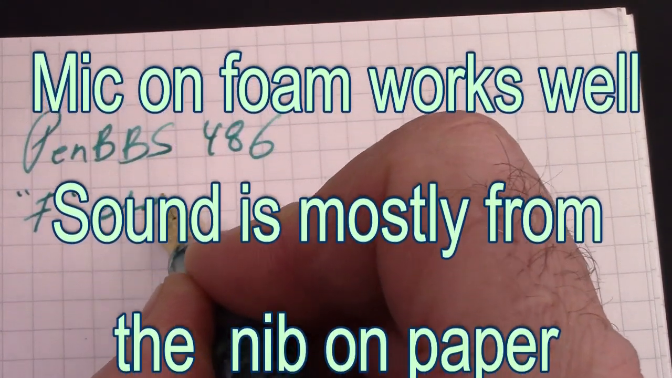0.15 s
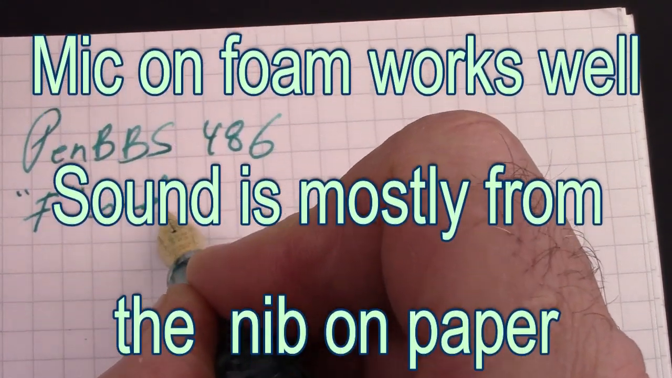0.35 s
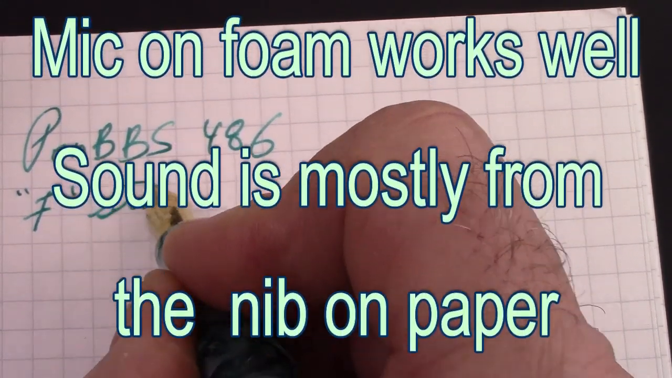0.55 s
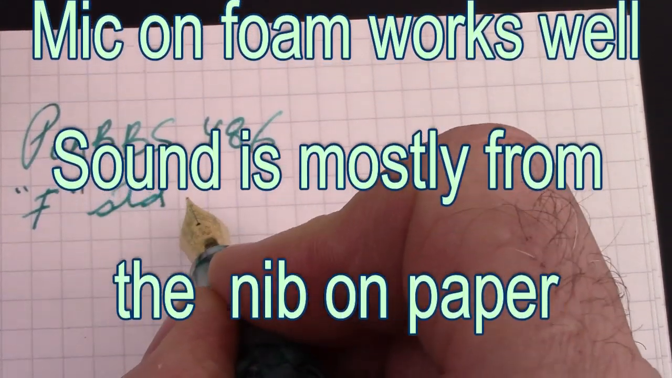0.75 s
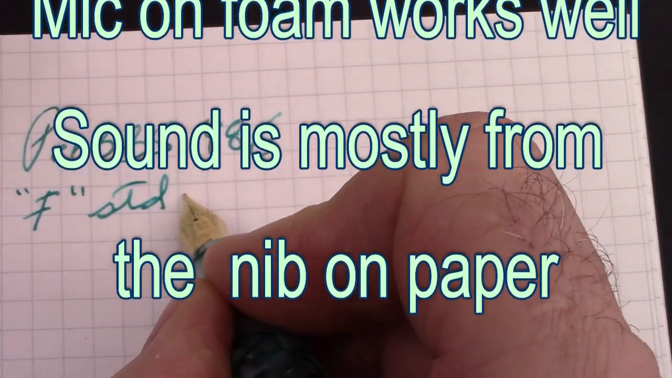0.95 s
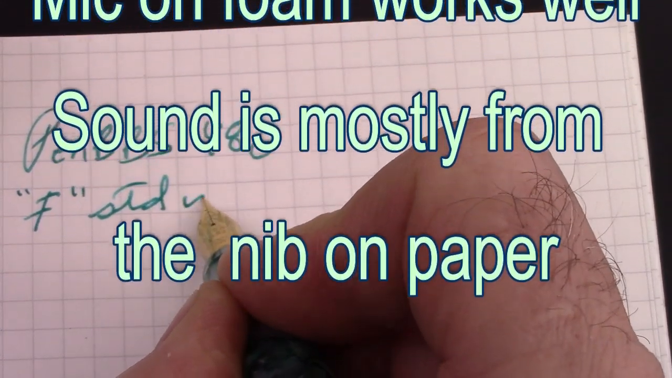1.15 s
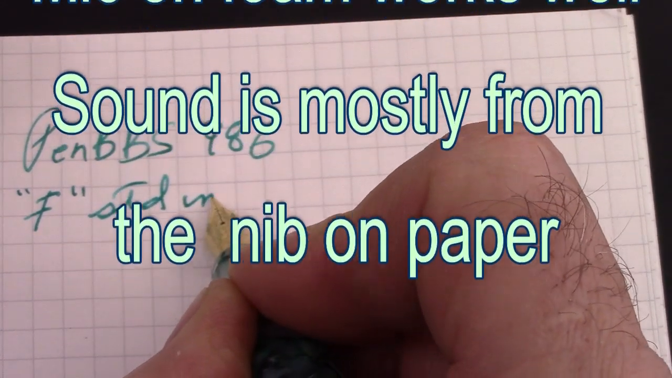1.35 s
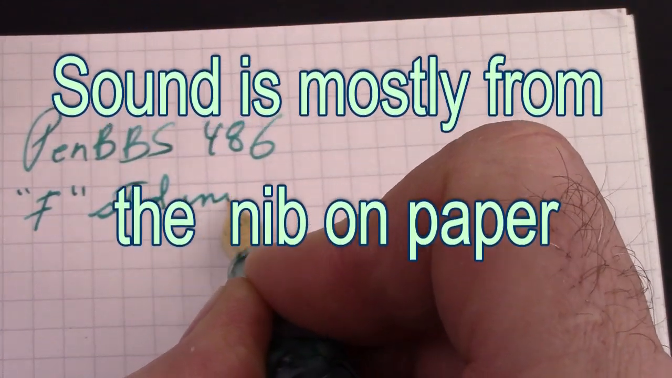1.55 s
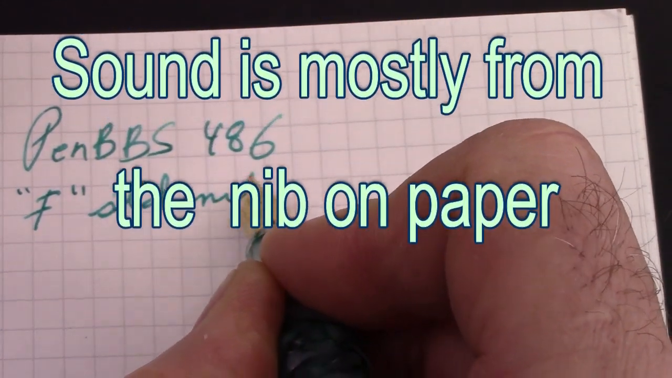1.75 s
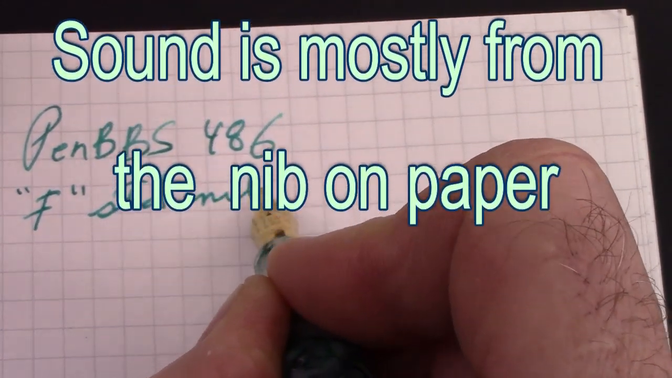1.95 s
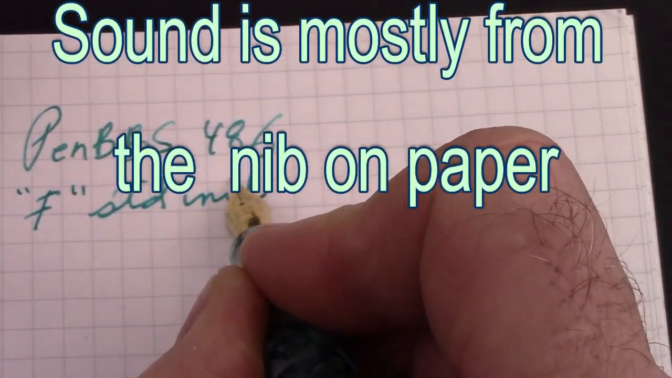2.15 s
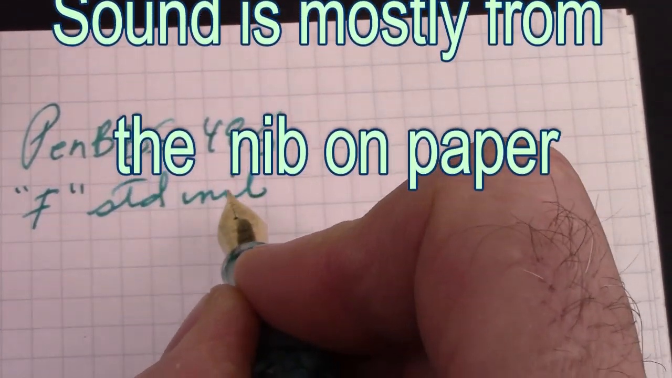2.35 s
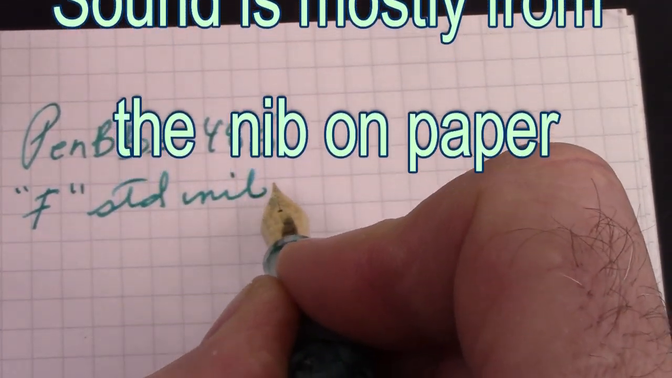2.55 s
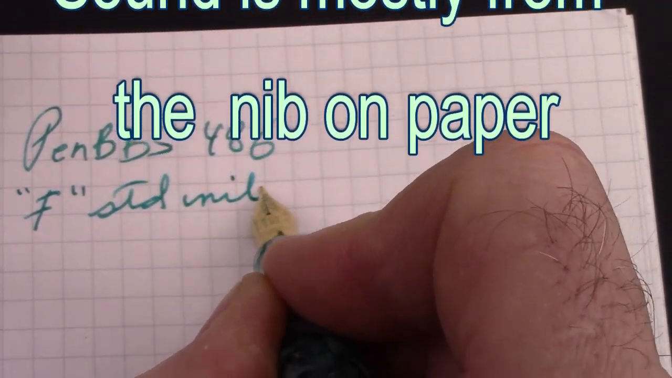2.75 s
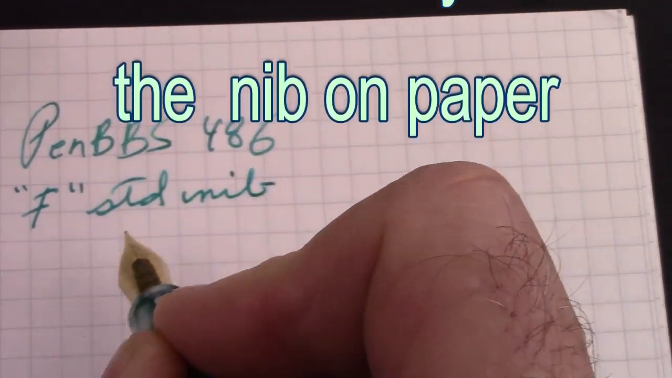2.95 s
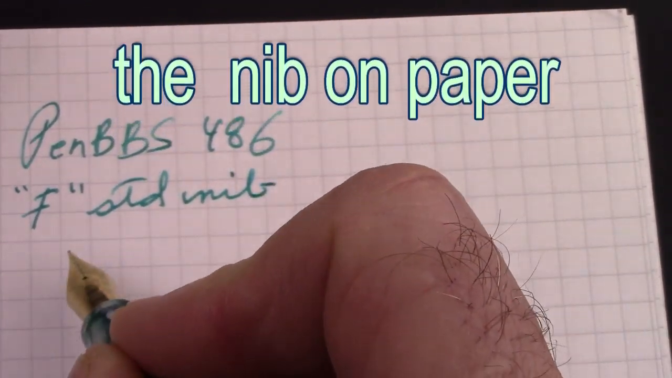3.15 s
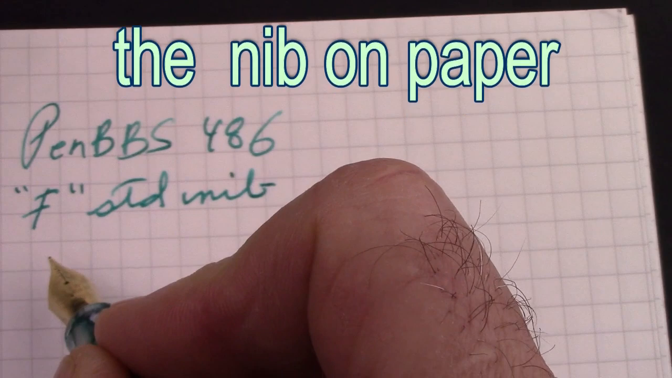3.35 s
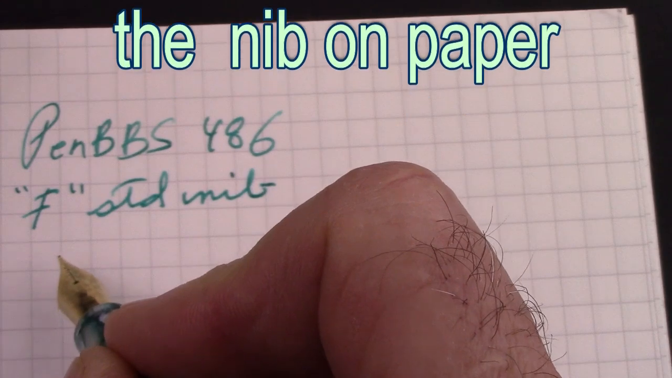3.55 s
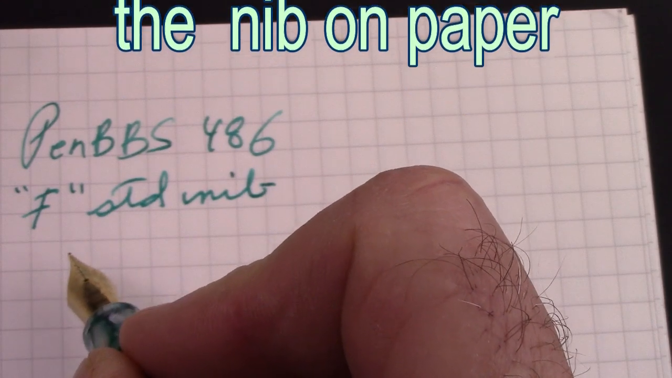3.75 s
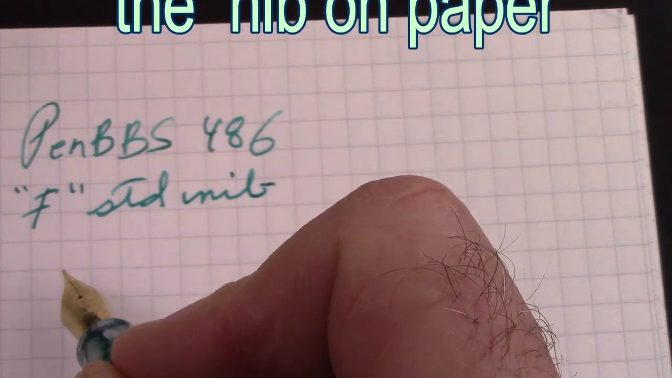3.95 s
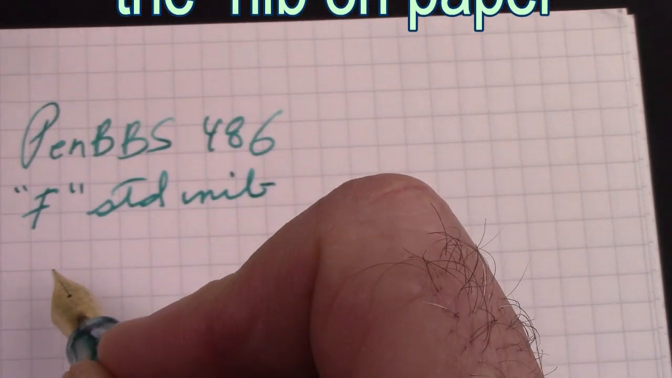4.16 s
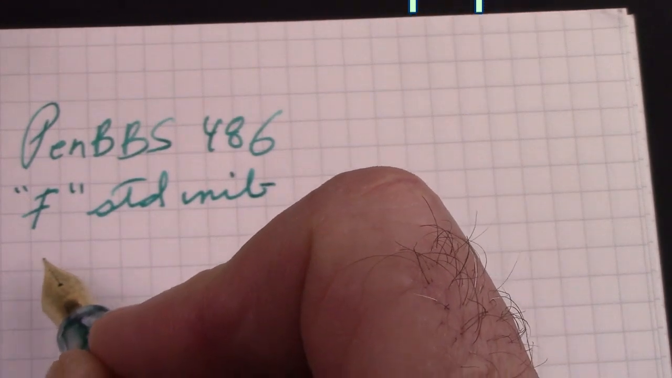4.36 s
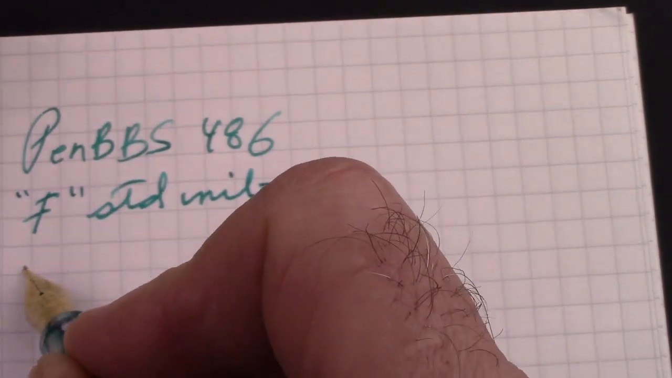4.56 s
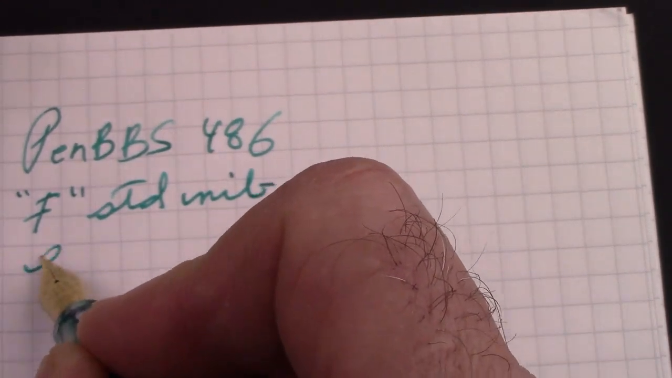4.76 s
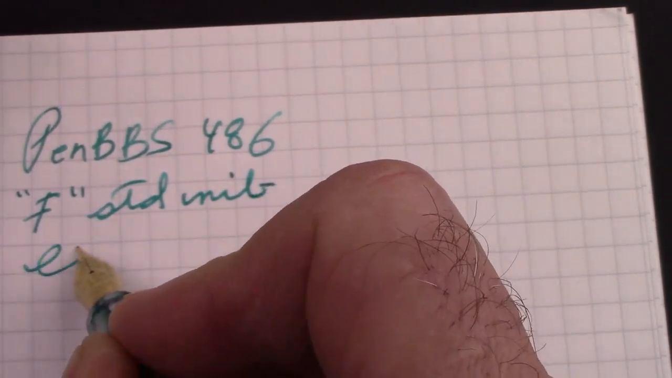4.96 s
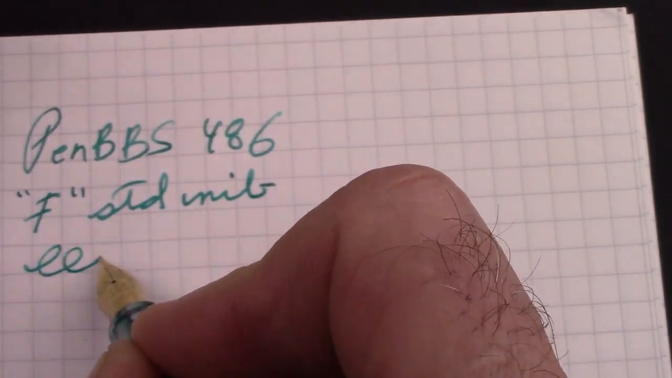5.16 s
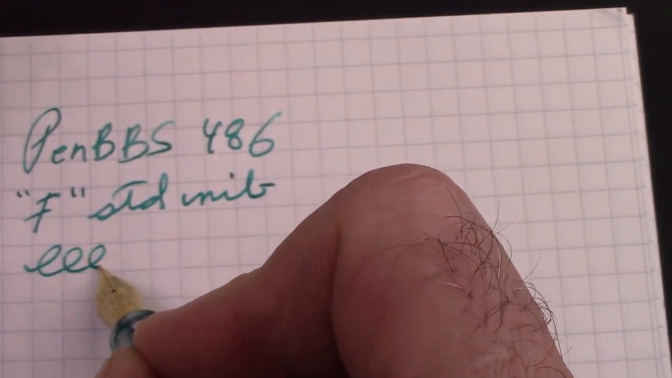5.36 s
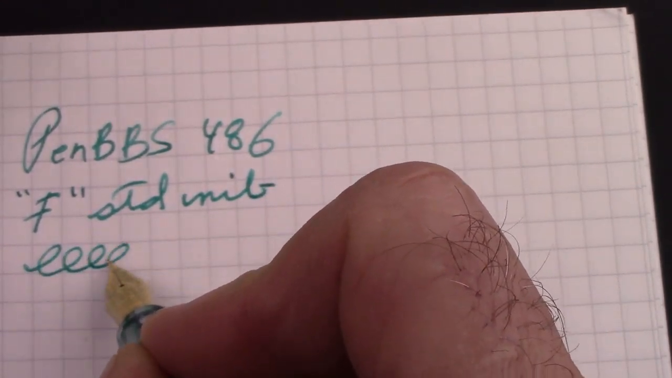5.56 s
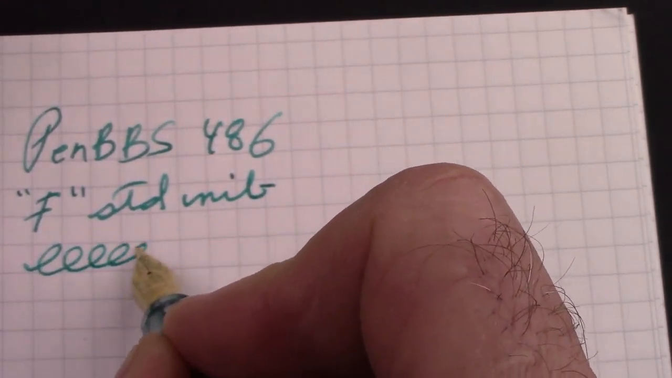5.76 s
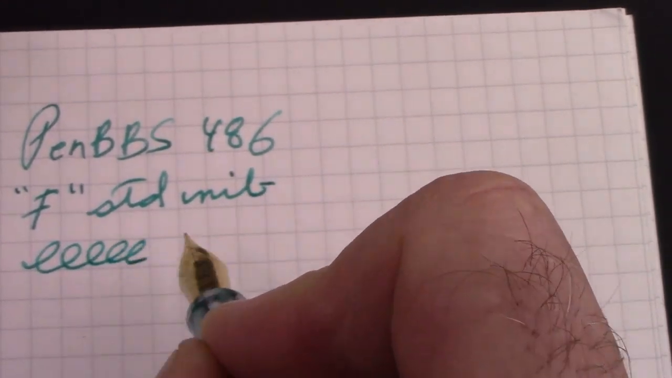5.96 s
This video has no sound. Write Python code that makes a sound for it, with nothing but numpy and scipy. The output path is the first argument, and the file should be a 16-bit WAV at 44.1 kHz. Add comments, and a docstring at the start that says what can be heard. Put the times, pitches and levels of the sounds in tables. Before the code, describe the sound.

In a quiet room, close and dry, a nib makes short papery scratches for about two seconds, mixed with crisp ticks and soft low thumps as the hand lifts and lands. A few light touches follow, then near quiet with hum and hiss and a barely audible cricket-like pulse. Finally the scratching returns louder, in steady quick back-and-forth strokes, about four a second, until the end.

```python
"""Nib writing on a paper pad

A metal nib writes on a pad in a quiet room, a microphone lying close on foam on the same desk.
Paper fibres pluck the nib: random plucks ring sheet, pad and tines. The hand slides with a brighter
hiss; taps tick (short crackle) and thump (smooth pushes ringing the desk). Behind: a wavering low hum
of drifting sines and rumble, a faint pulsing high tone, and coloured room and microphone hiss."""
import sys
import numpy as np
from scipy import signal
from scipy.fft import rfft, irfft
from scipy.io import wavfile
from scipy.ndimage import uniform_filter1d

SR = 44100
rng = np.random.default_rng(int(sys.argv[2]) if len(sys.argv) > 2 else 0)


def transcribe(u):
    """Save the signal u as a 16-bit wav file named by the first command-line argument.

    u: samples, shape (n,) or (channels, n), limited to [-1, 1]; the rate is SR.
    q: integer samples, one column per channel.
    """
    v = np.clip(np.atleast_2d(u).T, -1, 1)
    q = np.round(v * 32767).astype(np.int16)
    wavfile.write(sys.argv[1], SR, q)


def undo_db(level):
    """Turn decibels back into plain size, where 20 dB means ten times bigger."""
    steps = np.asarray(level, float) / 20
    return 10 ** steps


N = 264600
T = np.arange(N) / SR

# Strokes of the nib. Each row: time of peak in seconds, length in seconds, sheet scratch in dB rms,
# gain of the pad drag relative to the sheet in dB, gain of the airy top relative to the sheet in dB.
STROKES = [(0.023, 0.065, -48.5, 5.5, -13), (0.141, 0.11, -42, -1.5, -8.5), (0.261, 0.083, -40, 0.5, -15),
           (0.408, 0.047, -59.5, -3, 10), (0.506, 0.12, -41.5, 1, -7.5), (0.594, 0.074, -57.5, 2, 10.5),
           (.716, 0.15, -56.5, 8.5, -13), (0.914, 0.046, -47, 1, -7), (0.97, 0.078, -48, 3, -10),
           (1.064, 0.051, -42, 2, -12.5), (1.15, .05, -45.5, 5, -21), (1.258, 0.075, -52, 3, -7),
           (1.403, .14, -55, 6, -9), (1.526, 0.1, -47, 4.5, -18), (1.6, 0.11, -44.5, 3, -7.5),
           (1.779, 0.096, -43, 4, -13), (1.855, 0.12, -45, 5.5, -13.5), (1.985, 0.065, -58, 5, -1),
           (2.07, .1, -52, 4, -5), (2.203, 0.17, -54, -1.5, -3.5), (2.778, 0.091, -50.5, 5, -8),
           (2.878, 0.048, -48, 1, 3.5), (2.92, 0.068, -52.5, 3, 11.5), (3.06, 0.37, -60.5, -1, -1.5),
           (3.3, 0.28, -56.5, 1, -12), (3.91, 0.15, -57.5, 2, -2.5), (4.35, 0.52, -63, 3.5, -3),
           (4.545, 0.051, -52, 3, -8), (4.599, 0.076, -36.5, 5, -9.5), (4.655, 0.051, -41, -4, -10),
           (4.758, 0.13, -43.5, 2, -9), (4.844, 0.078, -35.5, 2, -11), (4.902, 0.069, -44.5, -9, -6),
           (5.017, 0.15, -45.5, -1, -11.5), (5.105, 0.079, -35.5, 0.5, -11.5),
           (5.164, 0.049, -43.5, 5, -11), (5.276, 0.094, -42.5, 1.5, -13), (5.356, 0.073, -37.5, .6, -12),
           (5.404, 0.064, -45.5, 1, -7.5), (5.519, .09, -43.5, 2.2, -11.5),
           (5.609, 0.094, -37.5, 2.5, -12.5), (5.657, 0.059, -43, -6, -14), (5.765, 0.054, -37.5, 1, -14.5),
           (5.841, 0.071, -43, 2.5, -10), (5.891, 0.073, -51.5, 8, -4), (5.936, 0.079, -55.5, 5, 12)]
NIB_REST_DB = -67.5  # gain between strokes


def level(x, db):
    """Scale to an rms level."""
    return x * undo_db(db) / np.sqrt(np.mean(x ** 2))


def peak(x, db):
    """Scale to a peak level."""
    return x * undo_db(db) / abs(x).max()


def resonance(x, hz, width_hz):
    """Two-pole band-pass, gain 1 at the centre."""
    return signal.lfilter(*signal.iirpeak(hz, hz / width_hz, fs=SR), x)


def body(x, modes, ratio=-1):
    """Sum of resonances, mode k weighted by ratio ** k; by default neighbours have opposite sign."""
    out = np.zeros(len(x))
    for k, (hz, width_hz, db) in enumerate(modes):
        out += ratio ** k * undo_db(db) * resonance(x, hz, width_hz)
    return out


def band(x, lo_hz, hi_hz):
    """Butterworth band-pass."""
    return signal.sosfilt(signal.butter(2, [lo_hz, hi_hz], "band", fs=SR, output="sos"), x)


def walk(rate_hz):
    """Random levels held 1 / rate_hz seconds and smoothed twice; spread near 1."""
    hold = int(SR / rate_hz)
    steps = np.repeat(rng.standard_normal(N // hold + 1), hold)
    return 1.338 * uniform_filter1d(uniform_filter1d(steps, hold), hold)[:N]


def fibres(spread_db, patchy_db, patch_rate_hz):
    """Dense tiny plucks, some stronger up to a limit, in patches of rougher and smoother paper."""
    tall = np.minimum(rng.exponential(size=N), 5)
    return rng.standard_normal(N) * undo_db(spread_db * tall + patchy_db * walk(patch_rate_hz))


def hiss(spectrum, db):
    """Steady noise of a given colour; its rms level is set in the band 266-13000 Hz."""
    hz, colour_db = np.transpose(spectrum)
    f = np.fft.rfftfreq(N, 1 / SR) + 1  # +1 avoids log(0)
    colour = undo_db(np.interp(np.log(f), np.log(hz), colour_db))
    x = irfft(rfft(rng.standard_normal(N)) * colour, N)
    return x * undo_db(db) / np.std(band(x, 266, 13000))


def gestures(rows, peak_dbs, rest_db, roundness=1.69):
    """Gain of gestures that swell and fade by one rule, summed in power over a resting level."""
    edge_db = 12  # drop from peak to either end of the length
    rise_share = 0.49  # part of the length spent rising
    power = np.full(N, undo_db(rest_db) ** 2)
    for (s, length_s), peak_db in zip(np.array(rows)[:, :2], peak_dbs):
        away = np.where(T < s, (s - T) / rise_share, (T - s) / (1 - rise_share)) / length_s
        near = away < 4
        power[near] += undo_db(peak_db - edge_db * away[near] ** roundness) ** 2  # roundness 1 = pointed
    return np.sqrt(power)


def room():
    """Hiss of room and microphone, wavering a little."""
    # Each row: frequency in Hz, relative density in dB per Hz.
    spectrum = [(53, -51), (90, -28), (125, 0.5), (148, -16), (188, -14.5), (290, -39), (345, -16),
                (410, -24.5), (532, -22.5), (1680, -31), (2130, -31.5), (5780, -34), (16000, -41.5)]
    return hiss(spectrum, -54.5) * undo_db(0.95 * walk(5.1))


def channel_hiss():
    """Faint coloured noise for the difference between the channels."""
    # Each row: frequency in Hz, relative density in dB per Hz.
    spectrum = [(59, -77), (100, -47), (174, -9), (398, -5), (2370, -7.5), (8640, -10), (14400, -14),
                (16000, -20)]
    return hiss(spectrum, -67.5)


def hum():
    """A low hum that wavers in level and pitch, blurred by rumble, with thinner tones above it."""
    # Each row: frequency in Hz, wander in Hz, relative level in dB.
    hum_modes = [(62, 2.5, 0), (74, 3, -7)]
    # Each row: frequency in Hz, level in dB rms, wavering in dB.
    thin_tones = [(121, -54, 1.5), (184, -60, 2.5), (1176, -77, 2.)]
    # Each row: time of peak in seconds, length in seconds, level of the hum without rumble in dB rms.
    swells = [(.05, 0.095, -39), (.22, .13, -34), (0.585, 0.37, -40.5), (1.136, 0.24, -38.5),
              (1.363, .13, -33.5), (1.5, 0.065, -32.5), (1.61, 0.081, -33), (1.83, 0.13, -32),
              (1.994, .16, -27.5), (2.108, 0.14, -32.5), (2.51, 0.13, -34), (2.6, 0.08, -32),
              (2.69, 0.075, -34), (2.93, 0.08, -36), (3.38, 0.049, -43), (4.683, 0.11, -33.5),
              (4.828, .1, -32.5), (4.928, 0.072, -32), (5.057, 0.076, -33), (5.295, 0.11, -39),
              (5.42, 0.065, -34), (5.622, 0.11, -33.5), (5.809, 0.053, -31), (5.945, 0.056, -33.5)]
    rest_db, rest_waver_db = -42, 2.5  # between swells
    wobble = np.zeros(N)
    for hz, wander_hz, db in hum_modes:
        phase = 2 * np.pi * np.cumsum(hz + wander_hz * walk(12)) / SR
        wobble += undo_db(db) * np.sin(phase)
    rumble = level(band(rng.standard_normal(N), 57, 102.4), -7.5)
    tones = np.zeros(N)
    for hz, db, waver_db in thin_tones:
        tones += undo_db(db + waver_db * walk(5.84)) * np.sqrt(2) * np.sin(2 * np.pi * hz * T)
    swell = gestures(swells, np.transpose(swells)[-1], rest_db + rest_waver_db * walk(16))
    return swell * (level(wobble, 0) + rumble) + tones


def chirps():
    """Evenly spaced pulses of one high tone, like a distant cricket, wavering in level and pitch."""
    # Each row: first pulse in seconds, end of the train in seconds (exclusive), level in dB rms.
    trains = [(.16, 1.9, -72), (2.09, 2.5, -67), (3.09, 4.72, -68), (5.02, 6, -66)]
    period_s, length_s, rest_db, tone_hz = 0.134, 0.075, -81, 5563
    rows = []
    for first_s, end_s, db in trains:
        rows += [(s, length_s, db) for s in np.arange(first_s, end_s, period_s)]
    rows = np.array(rows)
    gain = gestures(rows, rows[:, -1], rest_db, roundness=3) * undo_db(2.5 * walk(4))
    phase = 2 * np.pi * np.cumsum(tone_hz + 6 * walk(25)) / SR
    return gain * np.sqrt(2) * np.sin(phase)


def drag():
    """Gain of each stroke's pull on the pad."""
    drag_dbs = [db + pad_db for _, _, db, pad_db, _ in STROKES]
    return gestures(STROKES, drag_dbs, NIB_REST_DB + 2.5)


def desk():
    """Thumps ring the desk on its foam; the leaning hand sways it and each stroke flexes the board."""
    # Hand coming down. Each row: start in seconds, push height in dB before the desk rings,
    # push length in ms, initial rocking in dB rms.
    thumps = [(0.363, -19, 2.2, -44), (0.452, -8.5, 8.6, -37), (.481, -14, 18, -28),
              (.911, -16.5, 14.2, -29), (1.945, -20, 6.7, -42), (2.0532, -10, 7.1, -30),
              (2.934, -17, 1.9, -58), (3.039, -23.5, 2.2, -62), (4.47, -26.5, 2.6, -40),
              (5.955, -22, 5.7, -45)]
    # Each row: frequency in Hz, width in Hz, level in dB before the mode ratio.
    desk_modes = [(29.8, 23, -7), (72.7, 27, -3.5), (179, 135, 1)]
    # Weight of the working hand. Each row: time in seconds, relative level in dB.
    lean_points = [(0.0, -43), (0.43, -45.5), (0.67, -54), (0.89, -50), (0.98, -51), (2.86, -48.5),
                   (3.42, -60), (3.64, -51), (4.09, -57), (6.0, -42)]
    rock_t60_s, flex_lag_s = 0.5, 0.027
    push, rock = np.zeros(N), np.zeros(N)
    for s, db, push_ms, rock_db in thumps:
        i, n = int(s * SR), int(push_ms * SR / 1000)
        push[i:i + n] += undo_db(db) * np.hanning(n)
        rock[i:] += undo_db(rock_db - 60 * T[:N - i] / rock_t60_s)
    thump = 1.53 * body(push, desk_modes, ratio=0.8)

    lean = undo_db(np.interp(T, *np.transpose(lean_points)) + 4.6 * walk(9))
    sway = level(band(rng.standard_normal(N), 13.3, 53.6), 0)
    shiver = fibres(spread_db=2.0, patchy_db=0.8, patch_rate_hz=40)
    flex = level(band(shiver, 106.6, 262), 0)
    keep = np.exp(-1 / (flex_lag_s * SR))
    bend = undo_db(0.5) * signal.lfilter([1 - keep], [1, -keep], drag())  # smeared drag
    return thump + (undo_db(3.5) * lean + rock) * sway + (bend + undo_db(-8.5) * lean) * flex


def ticks():
    """Each tick is a snap with a few ms of crackle round its centre, a sharp top and a pad knock."""
    # Nib and paper. Each row: start in seconds, snap peak in dB, snap centre in Hz,
    # top end peak in dB, pad knock peak in dB.
    tick_rows = [(0.4471, -23, 3800, -22, -26), (0.6772, -36, 3110, -46, -38),
                 (0.7477, -39, 3230, -51, -40), (0.9018, -29, 3700, -30.5, -42),
                 (0.936, -44, 3190, -52, -30), (1.012, -37, 3100, -54, -45), (1.141, -25, 3540, -51, -22),
                 (1.3483, -28, 2840, -40, -25.5), (1.369, -33, 3280, -45, -24),
                 (1.403, -35.5, 3650, -51, -41), (1.4494, -33, 3000, -48, -35.5),
                 (1.495, -35, 3300, -52, -32.5), (1.5646, -32, 2360, -48, -31),
                 (1.747, -47, 3430, -50, -37), (1.7854, -30, 3180, -50, -19.5),
                 (1.854, -31, 3320, -44, -32), (2.0438, -28, 3970, -26.5, -29),
                 (2.0485, -31, 2140, -48, -22.5), (2.1, -49, 4530, -40, -53), (2.1222, -39, 1880, -53, -33),
                 (2.7662, -36, 2340, -51, -46), (2.9372, -29, 4210, -40, -29),
                 (2.995, -34.5, 2760, -50, -51), (3.03, -42, 3590, -45, -42), (3.042, -46, 3110, -50, -34),
                 (3.124, -40, 4310, -38, -46), (3.1746, -35, 3210, -37, -42), (3.2304, -38, 3710, -51, -35),
                 (3.307, -31.5, 3150, -60, -28.5), (3.319, -43, 3530, -52, -42),
                 (3.337, -39, 4380, -43, -47), (4.2498, -34, 2490, -48, -41),
                 (4.3518, -35, 2270, -52, -37.5), (4.437, -33, 3900, -27.5, -40),
                 (4.446, -37.5, 2380, -40, -31.5), (4.467, -33.5, 3970, -43, -28.5),
                 (4.4972, -31, 2860, -43, -39), (4.5735, -41, 1830, -45, -38), (4.628, -50, 2210, -45, -39),
                 (5.074, -44, 1830, -49.5, -30), (5.7032, -30.5, 3080, -48, -53),
                 (5.752, -42, 1780, -47, -34), (5.836, -28, 1980, -45, -28)]
    # Pad on the desk when tapped. Each row: frequency in Hz, width in Hz, relative level in dB.
    knock_modes = [(262, 120, -1.5), (500, 85, 1.5), (780, 490, -9)]
    n = 1800
    out, t = np.zeros(N), np.arange(n) / SR
    knock = body(t * np.exp(-t / 0.00018), knock_modes)
    for s, db, hz, top_db, knock_db in tick_rows:
        i = int(s * SR)
        decay = np.exp(-t / 0.0014) + 0.084 * np.exp(-t / 0.0042)
        crackle = np.sign(rng.standard_normal(n)) * decay
        crackle[0] = -4.0  # the snap
        snap = resonance(resonance(crackle, hz, 1.16 * hz), hz, 1.16 * hz)
        top = band(crackle, 4400, 12300)
        out[i:i + n] += peak(snap, db) + peak(top, top_db) + peak(knock, knock_db)
    return out


def hand():
    """Skin hisses brighter than the nib; its lowest ring comes out when the hand presses flat."""
    # Skin on the sheet. Each row: time of peak in seconds, length in seconds, level in dB rms,
    # lowest ring relative to that in dB.
    slides = [(.01, 0.087, -63, 2), (0.132, .1, -55, 1.5), (0.25, 0.043, -52.5, -1),
              (0.281, 0.052, -45, -7), (0.409, 0.058, -41, -3.5), (.5, .09, -53, 0),
              (0.588, 0.12, -42, -7.5), (.685, 0.026, -53, -4), (0.763, .1, -60, -5), (0.966, .07, -54, -9),
              (1.068, .05, -53.5, -4), (1.157, 0.043, -46.5, -6), (1.353, 0.05, -55, -4),
              (1.521, .075, -47, -8.5), (1.62, .08, -55.5, -11), (1.804, 0.062, -45.5, -4.5),
              (1.864, 0.038, -49.5, -4), (1.993, 0.06, -43.5, -6), (2.065, .06, -53.5, -7),
              (2.212, 0.077, -48.5, -7), (2.296, 0.094, -58.5, -4), (2.676, 0.031, -57.5, -1),
              (2.75, 0.11, -58.5, -4), (2.907, 0.12, -41, -6.5), (2.996, .08, -56, -6),
              (3.046, 0.037, -48.5, -7), (3.126, 0.031, -54, -7), (3.268, 0.18, -59, -3),
              (3.9, 0.095, -48, -2), (4.268, .11, -56.5, -0.5), (4.458, .1, -60.5, -1),
              (4.624, 0.13, -55, -4), (4.847, 0.067, -47.5, -4), (5.108, 0.089, -54, -2),
              (5.366, .11, -48.5, -5), (5.609, .11, -48.5, -4), (5.77, 0.091, -55, -7),
              (5.925, 0.12, -44, -7.5), (5.995, 0.025, -42.5, -5)]
    # Each row: frequency in Hz, width in Hz, relative level in dB (no effect in the first, set per slide).
    skin_modes = [(1940, 280, 2.5), (3090, 440, 6.5), (3780, 820, 3), (4830, 630, 5.5), (7800, 7800, -8.5),
                  (10800, 3100, -18)]
    rest_db, roundness = -72, 2.8  # flatter tops than the strokes
    rub = fibres(spread_db=3.0, patchy_db=3.0, patch_rate_hz=110)
    db, low_db = np.transpose(slides)[-2:]
    upper = level(body(rub, skin_modes[1:]), 0)
    lowest = level(body(rub, skin_modes[:1]), 0)
    upper_gain = gestures(slides, db, rest_db, roundness)
    lowest_gain = gestures(slides, db + low_db, rest_db, roundness)
    return upper_gain * upper - lowest_gain * lowest


def nib():
    """Plucks ring the sheet, drag dully in the pad and leave the tines as an airy scratch."""
    # Rings of the top sheet. Each row: frequency in Hz, width in Hz, relative level in dB before wander.
    sheet_modes = [(945, 226, 0), (1320, 343, -1), (1550, 210, 2), (1880, 273, -2.5)]
    # Low rings of the pad. Each row: frequency in Hz, width in Hz, relative level in dB.
    pad_modes = [(218, 33, 1), (348, 56, -0.5), (461, 70, 5), (639, 156, -2)]
    # Airy rings of the nib. Each row: frequency in Hz, width in Hz, relative level in dB.
    nib_modes = [(4800, 1160, -0.5), (7050, 1540, 4.5), (10160, 2100, -2), (11500, 470, 5.5),
                 (13040, 1400, 0), (15200, 1100, -7)]
    # One ring of the tines: frequency in Hz, width in Hz, level in dB rms before the stroke gain.
    tine_ring = (3310, 410, -15)
    sheet_edge_hz = 2400  # the sheet stops radiating above this
    colour_db, colour_rate_hz = 1.5, 22  # each sheet ring wanders as the nib turns
    tine_growth, tine_pivot_db = 0.36, -36  # extra dB per dB of stroke above the pivot, less below
    db, air_db = np.transpose(STROKES)[[2, 4]]

    plucks = fibres(spread_db=3.0, patchy_db=2.5, patch_rate_hz=110)
    rings = np.zeros(N)
    for k, mode in enumerate(sheet_modes):
        rings += (-1) ** k * undo_db(colour_db * walk(colour_rate_hz)) * body(plucks, [mode])
    sheet = level(band(rings, 410, sheet_edge_hz), 0)
    pad = level(body(plucks, pad_modes), -2.24)
    tine_hz, tine_width_hz, tine_db = tine_ring
    tine = level(resonance(plucks, tine_hz, tine_width_hz), tine_db)
    fine = fibres(spread_db=4.0, patchy_db=2.5, patch_rate_hz=54)
    air = level(body(fine, nib_modes) + 0.33 * band(fine, 1900, 14000), 0.41)

    sheet_gain = gestures(STROKES, db, NIB_REST_DB)
    tine_gain = gestures(STROKES, db + tine_growth * (db - tine_pivot_db), NIB_REST_DB)
    air_gain = gestures(STROKES, db + air_db, NIB_REST_DB + 1.0)
    return sheet_gain * sheet + drag() * pad + tine_gain * tine + air_gain * air


def scene():
    """One microphone feeds both channels; they differ only by a faint coloured noise, added to one and taken
    from the other."""
    mono = room() + hum() + chirps() + desk() + ticks() + hand() + nib()
    apart = channel_hiss()
    return np.array([mono + apart, mono - apart])


def low_pass(x):
    """Removes everything above the highest recorded frequency."""
    return signal.sosfilt(signal.butter(12, 16670, fs=SR, output="sos"), x)


def record(dry):
    """A steep elliptic low-pass cuts the top above 15.8 kHz."""
    cut = signal.ellip(8, 0.2, 50, 15800, fs=SR, output="sos")
    mix = signal.sosfilt(cut, dry)
    return low_pass(mix)


dry = scene()
out = record(dry)
transcribe(out)
```